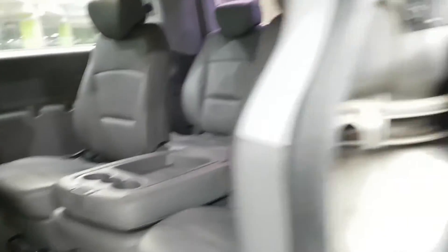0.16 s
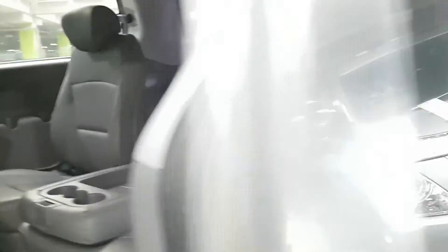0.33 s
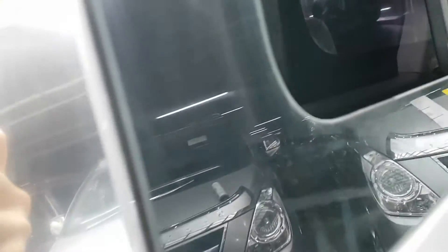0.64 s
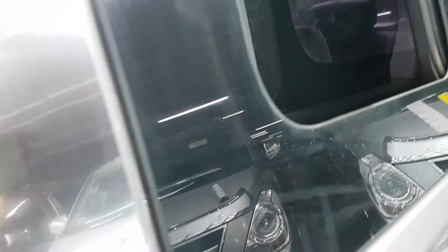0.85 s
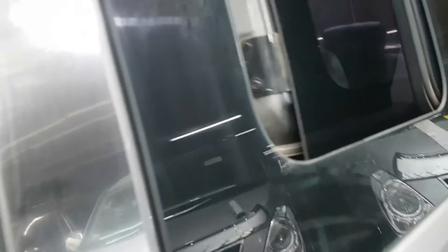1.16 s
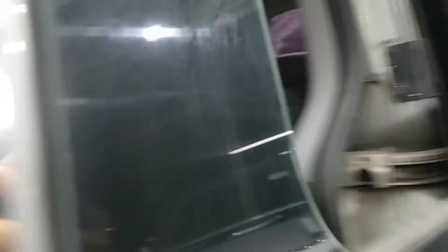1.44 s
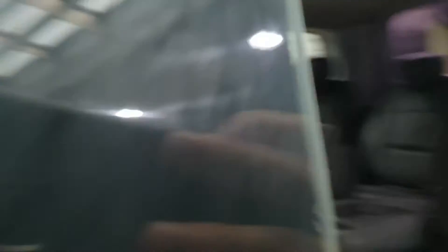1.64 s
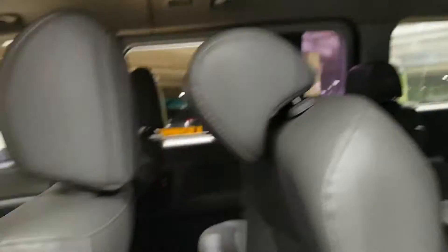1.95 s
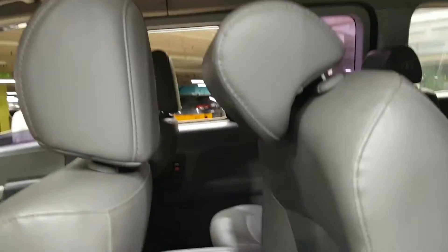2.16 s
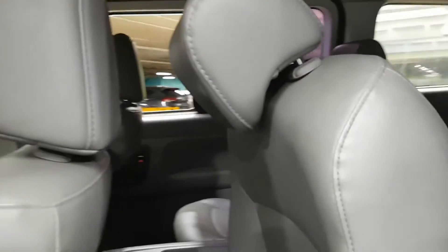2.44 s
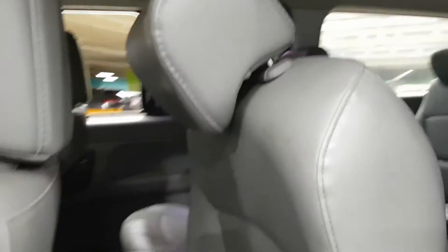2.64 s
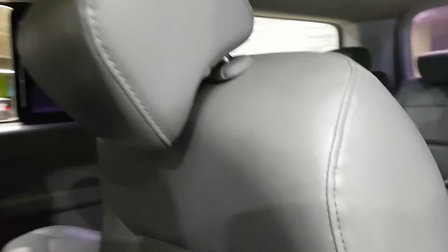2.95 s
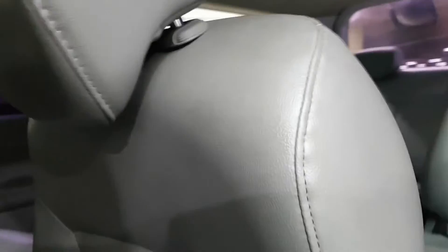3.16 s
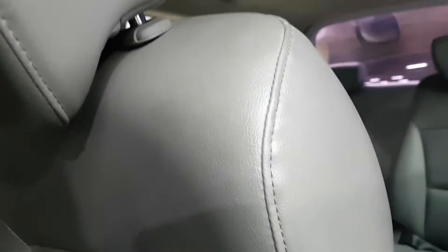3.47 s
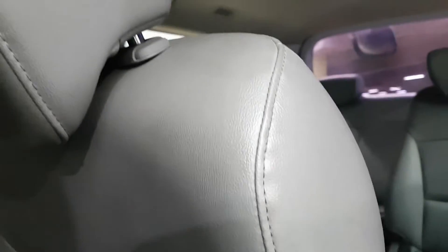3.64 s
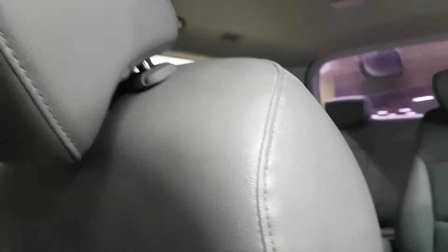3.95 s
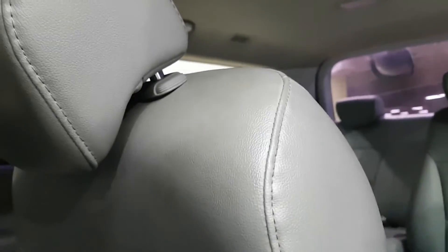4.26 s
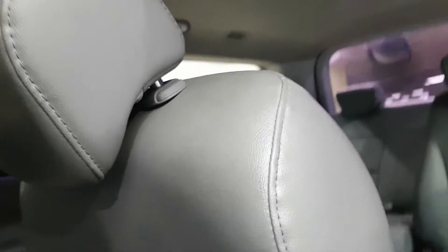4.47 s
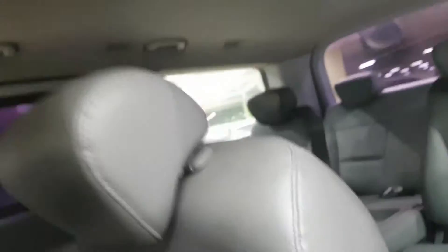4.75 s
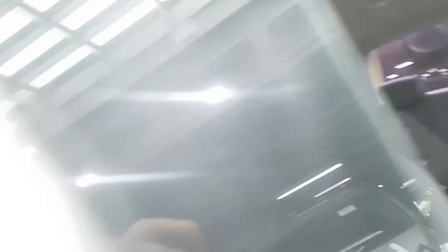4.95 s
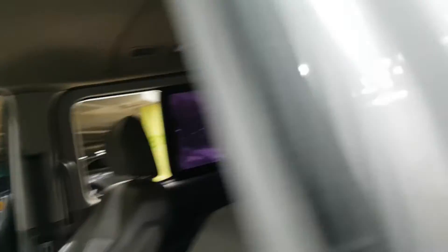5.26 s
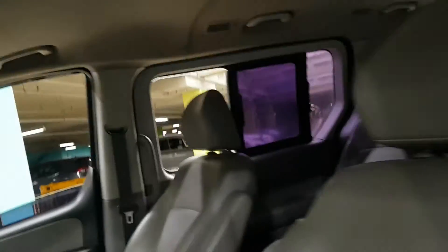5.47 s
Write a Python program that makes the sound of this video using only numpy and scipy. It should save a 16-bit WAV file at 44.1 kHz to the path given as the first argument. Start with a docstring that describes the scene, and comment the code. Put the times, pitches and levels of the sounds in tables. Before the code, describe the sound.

Over an idling van's hum, a latch clacks, a sliding door rumbles shut with a booming slam, and something knocks on a panel.

```python
"""A van idles in a parking garage: a throbbing hum and a belt drone over a wash of air.
The handle of its sliding door is pulled and the latch lets go, ringing steel and door skin.
The door rolls along its rough track, whirring higher with speed, and slams; the body booms and rattles.
Engine and air dip after the slam and return; later something knocks dully on a panel.
Blows, knocks and ticks reverberate off the concrete."""
import sys
import numpy as np
from scipy import signal
from scipy.fft import rfft, irfft, next_fast_len
from scipy.io import wavfile
from scipy.ndimage import uniform_filter1d, map_coordinates

SR = 44100
rng = np.random.default_rng(int(sys.argv[2]) if len(sys.argv) > 2 else 0)


def file_out(sig):
    """Save sig as 16-bit WAV at sys.argv[1]."""
    # one column per channel
    cols = np.atleast_2d(sig).T
    # limit, then scale
    lim = np.clip(cols, -1, 1)
    pcm = np.round(lim * 32767).astype(np.int16)
    wavfile.write(sys.argv[1], SR, pcm)


N = 247401
TIME_S = np.arange(N) / SR
HIT_TIME_S = np.arange(SR // 2) / SR


def amp(db):
    return 10 ** (np.asarray(db) / 20)


def unit(x):
    return x / np.sqrt(np.mean(x ** 2) + 1e-20)


def pan(left_minus_right_db):
    return amp([[left_minus_right_db / 2], [-left_minus_right_db / 2]])


def add_at(out, start_s, sound):
    out[..., round(start_s * SR):][..., :sound.shape[-1]] += sound


def along(points, hz):
    """Interpolate (freq_hz, value) points on a log axis."""
    freqs_hz, values = np.transpose(points)
    return np.interp(np.log(hz + 1), np.log(freqs_hz + 1), values)


def curves(rows):
    """One value per sample for each column after time_s."""
    times_s, *columns = np.transpose(rows)
    return [np.interp(TIME_S, times_s, column) for column in columns]


def gate(start_s, end_s):
    """1 from start to end, with short fades."""
    return uniform_filter1d(1. * (TIME_S > start_s) * (TIME_S < end_s), size=200)


def wobble(rate_hz):
    """Smooth random curve."""
    return map_coordinates(rng.standard_normal(int(N * rate_hz / SR) + 4), [TIME_S * rate_hz])


def filtered(x, response):
    """Apply a complex frequency response."""
    size = next_fast_len(N + SR // 2)
    return irfft(rfft(x, size) * response(np.fft.rfftfreq(size, 1 / SR)), size)[..., :N]


def mic_ports(x, lead_samples):
    """Sound reaches the left microphone port before the right."""
    return filtered(x, lambda hz: np.exp(1j * np.pi * hz * lead_samples / SR * np.array([[1], [-1]])))


def noise(spectrum, coherence, lumps_db, lumps_hz, lead_samples=0.):
    """Lumpy stereo noise, rms 1. spectrum: freq_hz, density_db; coherence: freq_hz, correlation."""
    pair = rng.standard_normal((2, N)) * amp(lumps_db * wobble(lumps_hz))

    def mid_side_gains(hz):
        angle = np.arccos(np.clip(along(coherence, hz), -1, 1)) / 2
        return amp(along(spectrum, hz)) * [np.cos(angle), np.sin(angle)]

    mid, side = filtered(pair, mid_side_gains)
    return unit(mic_ports(np.array([mid + side, mid - side]), lead_samples))


def ring(modes, t, attack_s):
    """Damped modes, at new strengths for every blow."""
    tones = sum(amp(db + rng.normal(0, 1) - 60 * t / t60_s) * np.sin(2 * np.pi * hz * t)
                for hz, db, t60_s in modes)
    return tones * (1 - np.exp(-t / attack_s))


def swells(rows, depth_db=32):
    """Gain that rises, holds and falls for each row."""
    gain = np.zeros(N)
    for start_s, rise_s, hold_s, fall_s, db in rows:
        corners_s = np.cumsum([start_s, rise_s, hold_s, fall_s])
        shape_db = np.interp(TIME_S, corners_s, [-depth_db, 0, 0, -depth_db])
        gain += gate(start_s, corners_s[-1]) * amp(db + shape_db)
    return gain


def dip_db(lowest_s=2.65, fall_s=0.61, depth_db=-11, return_tau_s=0.34):
    """The background sinks after the slam and creeps back."""
    t = TIME_S - lowest_s
    return depth_db * np.where(t < 0, np.clip(1 + t / fall_s, 0, 1), np.exp(-np.abs(t) / return_tau_s))


# Air spectra: freq_hz, density_db
WASH_SPECTRUM = [(71, -9.5), (120, -9.5), (198, -13.5), (268, -13), (322, -10), (429, -14), (627, -12.5),
                 (787, -16.5), (930, -16), (1280, -20), (2600, -24), (3350, -26.5), (3800, -33),
                 (4500, -34), (5850, -57), (9900, -120)]
HISS_SPECTRUM = [(1760, -35), (3000, -20), (3260, -21.5), (4110, -18), (4860, 4), (12200, -12),
                 (15000, -10), (16000, -27)]
# Left-right likeness: freq_hz, correlation
AIR_COHERENCE = [(60, 0.6), (240, 0.92), (950, 0.31), (3770, -0.11), (15000, -0.02)]
# Air before the dip: time_s, level_db
AIR_LEVELS = [(0, -37.5), (1.1, -35.5), (2.6, -35.5), (3.7, -38), (4.4, -37.5), (5.2, -35.5), (5.61, -36.5)]


def garage_air():
    """A broad wash under a fainter high hiss."""
    wash = noise(WASH_SPECTRUM, AIR_COHERENCE, lumps_db=.3, lumps_hz=40)
    hiss = amp(-21.5) * noise(HISS_SPECTRUM, AIR_COHERENCE, lumps_db=.3, lumps_hz=60)
    return amp(curves(AIR_LEVELS)[0] + dip_db()) * (wash + hiss) * pan(-.8)


# Faint swells: start_s, rise_s, hold_s, fall_s, level_db
THIN_HISS_SWELLS = [(.0, 0.074, 0.23, .1, -62.5)]
RUSTLE_SWELLS = [(.587, 0.0069, 0.021, 0.054, -44), (3.2, .07, 0.3, .1, -58)]


def thin_hiss(sink_hz_per_s=1500):
    """A narrow band slides down from about 11.5 kHz."""
    spectrum = [(10300, -40), (11300, -3), (11900, -2), (12700, -8), (14000, -42)]
    band = noise(spectrum, [(9000, .3)], lumps_db=1, lumps_hz=40.4)
    shift = np.exp(-1j * np.pi * sink_hz_per_s * TIME_S ** 2)
    return swells(THIN_HISS_SWELLS) * np.real(shift * signal.hilbert(band))


def rustle():
    """Brief, bright, grainy noise."""
    spectrum = [(1200, -27), (2500, 4), (4000, 0), (8000, -5), (12000, -8), (16000, -8)]
    return swells(RUSTLE_SWELLS) * noise(spectrum, [(9000, 0.34)], lumps_db=2, lumps_hz=149)


# Engine partials: firing_multiple, level_db
LOW_HUM_ORDERS = [(1, 4.5), (2, -1)]
HIGH_HUM_ORDERS = [(5, -20), (6, 0), (7, -5), (8, -8), (9, -2), (10, -6.5), (11, -12), (12, -3), (13, -13),
                   (15, -15), (18, -7), (19, -7.5), (24, -10), (36, -6)]
BELT_ORDERS = [(12.45, 0), (11.8, -7), (24.95, -14), (21.95, -16)]
# Idle speed: time_s, firing_hz
FIRING_RATE = [(0, 26.14), (3.4, 26.14), (4, 26.23), (5.61, 26.23)]
# Engine before the dip: time_s, hum_db, drone_db
ENGINE_LEVELS = [(0, -34, -46.5), (1.1, -31.5, -50), (1.8, -31.5, -47), (2.2, -35.5, -48),
                 (2.9, -35, -39.5), (3.5, -36, -42), (4, -35.5, -43.5), (4.8, -37, -38), (5.3, -40.5, -38),
                 (5.61, -48, -45)]


def engine(first_firing_s=0.00897, lean_in_s=(1.5, 2.2)):
    """Firing orders throb in step, with one puff per firing and a belt-driven drone near 320 Hz."""
    hum_db, drone_db = np.add(curves(ENGINE_LEVELS), dip_db())
    # The balance shifts as the microphone leans from beside the van into the doorway.
    low_gain, fourth_gain, high_gain = [amp(hum_db + np.interp(TIME_S, lean_in_s, from_to_db))
                                        for from_to_db in ((-18, -11), (-3, -5.5), (-17, -14))]
    firing_hz = curves(FIRING_RATE)[0]
    phase = 2 * np.pi * (np.cumsum(firing_hz) / SR - firing_hz[0] * first_firing_s)

    def partials(orders, waver_db):
        return sum(np.sqrt(2) * amp(db + waver_db * wobble(6)) * np.cos(k * phase + rng.normal(0, .4))
                   for k, db in orders)

    hum = low_gain * partials(LOW_HUM_ORDERS, waver_db=.8)
    hum += amp(hum_db) * partials([(3, 0)], waver_db=.45)
    hum += fourth_gain * partials([(4, 0)], waver_db=.64)
    hum += high_gain * partials(HIGH_HUM_ORDERS, waver_db=2.9)
    drone = amp(drone_db) * partials(BELT_ORDERS, waver_db=.6)
    pipe_spectrum = [(25, -30), (40, -5), (150, -5), (280, -11), (600, -25), (1200, -63)]
    pipe = noise(pipe_spectrum, [(100, 0.75)], lumps_db=7.5, lumps_hz=8.3)
    puffs = high_gain * amp(2.5) * unit(np.exp(1.9 * np.cos(phase)) * pipe)
    return (hum + drone + puffs) * pan(-.6)


# Garage decay: freq_hz, t60_s
GARAGE_DECAY = [(100, 0.34), (1000, 0.41), (5000, 0.23), (14000, 0.33)]


def garage_reverb(x, predelay_samples=300):
    """Reflections off concrete; each frequency dies at its own rate."""
    hz, t, bins = signal.stft(rng.standard_normal((2, SR // 2)), SR, nperseg=256)
    decay = amp(-60 * t / along(GARAGE_DECAY, hz)[:, None])
    tail = signal.istft(bins * decay, SR, nperseg=256)[1]
    delayed = np.pad(x, ((0, 0), (predelay_samples, 0)))
    return signal.fftconvolve(delayed, tail / np.linalg.norm(tail[0]), axes=1)[:, :N]


# Small ticks: start_s, level_db, pitch_hz, t60_s
TICK_EVENTS = [(0.5919, -34.5, 4200, 0.027), (.609, -34, 2590, 0.017), (0.637, -29.5, 3600, 0.016),
               (.705, -48, 7100, .01), (.88, -34, 7500, 0.016), (1.92, -45, 4500, 0.034),
               (2.1675, -20.5, 2700, 0.015), (3.092, -42, 7500, .008), (3.253, -45, 8900, .03),
               (3.827, -41.5, 9100, .01), (5.173, -40.5, 4500, 0.017)]


def ticks(band_ratio=1.67):
    """Short bright bursts of band noise."""
    out, t = np.zeros((2, N + SR)), HIT_TIME_S
    for start_s, db, hz, t60_s in TICK_EVENTS:
        band = signal.butter(2, [hz / band_ratio, hz * band_ratio], "band", fs=SR, output="sos")
        burst = unit(signal.sosfilt(band, rng.standard_normal((2, len(t)))))
        add_at(out, start_s, burst * amp(db - 60 * t / t60_s))
    return out[:, :N]


# Latch parts: freq_hz, density_db
LATCH_SPECTRUM = [(290, -23), (500, -8.5), (974, -8), (1190, -7), (1550, -11), (2230, -14.5), (2540, -15.5),
                  (2890, -16), (3440, -21.5), (6610, -25.5), (8960, -31.5), (14700, -30.5), (16000, -38)]


def latch_clatter():
    """Unbroken noise of loose latch parts, for contacts to draw on."""
    return noise(LATCH_SPECTRUM, [(600, 0.43), (2000, 0.14), (8000, 0.076)], lumps_db=-1, lumps_hz=114.85)


def contact(clatter, cutoff_hz):
    """A random stretch of clatter; a softer contact is duller."""
    lowpass = signal.butter(2, cutoff_hz, fs=SR, output="sos")
    start = rng.integers(N - len(HIT_TIME_S))
    return signal.sosfilt(lowpass, clatter[:, start:start + len(HIT_TIME_S)])


# Trim panel: pitch_hz, level_db, t60_s
TRIM_MODES = [(54, -12, 0.2), (158.3, -1.5, 0.1), (229, 7, 0.066), (262, -3, 0.065), (323, -11, 0.089),
              (370.3, -14.5, 0.25), (498, -7, 0.066), (608, -1.5, 0.052), (630, -6.5, 0.064),
              (1000, -23, 0.1), (1695, -21, 0.049)]
# Dull knocks: start_s, ring_db, rattle_db, left_minus_right_db
PANEL_KNOCKS = [(3.399, -29.5, -40.5, -5), (3.538, -4.5, -26.5, 0.5), (3.579, -16, -34.5, -5),
                (4.107, -33, -42, -5)]


def panel_knocks(clatter):
    """Knocks ring a panel and rattle loose parts."""
    out, t = np.zeros((2, N + SR)), HIT_TIME_S
    for start_s, ring_db, rattle_db, pan_db in PANEL_KNOCKS:
        rattle_gain = amp(rattle_db - 60 * t / 0.16) * (1 - np.exp(-t / 0.0027))
        rattle = rattle_gain * contact(clatter, cutoff_hz=6900)
        panel = amp(ring_db) * ring(TRIM_MODES, t, attack_s=0.0047)
        add_at(out, start_s, (panel + rattle) * pan(pan_db))
    return out[:, :N]


# Uneven spots of the track: start_s, level_db
TRACK_BUMPS = [(1.113, -17.5), (1.164, -13), (1.236, -20), (1.302, -22), (1.351, -27), (1.392, -33),
               (1.469, -17), (1.535, -17), (1.616, -6.5), (1.706, -5.5), (1.789, -5.5), (1.88, -11),
               (1.955, -14), (2.041, -6)]
# Door on its runner: pitch_ratio, level_db, t60_s
RUNNER_MODES = [(1, 0, .1), (1.68, -4, .09), (2.35, -7, .06)]


def track_jolts(speed):
    """Bumps ring the door on its runner, higher at speed."""
    out, t = np.zeros(N + SR), np.arange(SR // 4) / SR
    for start_s, db in TRACK_BUMPS:
        lowest_hz = np.interp(speed[round(start_s * SR)], [0, 1], (173.3, 215))
        modes = np.multiply(RUNNER_MODES, [lowest_hz, 1, 1])
        add_at(out, start_s, amp(db) * ring(modes, t, attack_s=0.0063))
    return out[:N]


# Rolling spectra: freq_hz, density_db
RUMBLE_SPECTRUM = [(35, -50), (60, -13), (168, -2), (200, 2.5), (275, -2.5), (337, -5.5), (410, -11),
                   (494, -13), (700, -20), (910, -50), (1540, -120)]
TRACK_SPECTRUM = [(210, -33), (350, -0.5), (612, -3), (740, -8), (979, -9), (1200, -10), (1280, -14),
                  (2500, -26.5), (3250, -69), (5500, -120)]
SEAL_SPECTRUM = [(880, -26), (1500, -1.5), (3250, -8.5), (4330, -14), (4590, -14), (5940, -23), (9470, -31),
                 (15100, -29), (16000, -39)]
# Door travel: time_s, speed_fraction
DOOR_SPEED = [(1.09, .005), (1.125, 0), (1.289, 0.1), (1.351, 0.24), (1.5, .5), (1.8, .91), (1.898, 0.95),
              (2.002, 0.86), (2.129, 0.9)]


def door_roll(whir_hz=(300, 838), tuck_s=1.87, tuck_db_per_s=18):
    """Rollers on the rough track shake the door skin; their whir rises with speed; the seal hisses."""
    speed = np.clip(curves(DOOR_SPEED)[0], .001, 1)
    moving = gate(DOOR_SPEED[0][0], DOOR_SPEED[-1][0])

    def drive(full_speed_db, db_per_decade):
        return moving * amp(full_speed_db + db_per_decade * np.log10(speed))

    tuck = amp(-tuck_db_per_s * np.maximum(TIME_S - tuck_s, 0))  # the door swings in towards the body
    phase = 2 * np.pi * np.cumsum(np.interp(speed, [0, 1], whir_hz)) / SR
    whir_band = unit(wobble(220) * np.sin(phase) + wobble(220) * np.cos(phase))
    whir = drive(-23.5, 53) * tuck ** 2 * whir_band
    rollers = mic_ports(whir + track_jolts(speed), lead_samples=6.7)
    coherence = [(100, 0.99), (400, 0.96), (1000, 0.84), (3000, 0.088)]
    rumble = noise(RUMBLE_SPECTRUM, coherence, lumps_db=0.5, lumps_hz=30, lead_samples=4.8)
    track = noise(TRACK_SPECTRUM, coherence, lumps_db=0.5, lumps_hz=60.9, lead_samples=10.5)
    seal = noise(SEAL_SPECTRUM, coherence, lumps_db=1, lumps_hz=84)
    return rollers + drive(-15.5, 9) * rumble + tuck * (drive(-18.5, 22.5) * track + drive(-35.5, 23) * seal)


# Door skin, van body, latch steel: pitch_hz, level_db, t60_s
SKIN_MODES = [(158.4, -5.5, 0.29), (234.3, 6, 0.12), (269, -2.5, 0.18), (299, 0, 0.17), (359, -6, 0.21),
              (453, -3.5, 0.088), (512, -1.5, 0.061), (618, -5, 0.067)]
BODY_MODES = [(28, -9, .6), (36, -6, 0.21), (61, 10, 0.079), (78.6, -3.5, 0.44), (102.5, -1, 0.27)]
STRIKER_MODES = [(980, -4, .03), (1180, 0, .045), (1400, -3, .035), (1910, -5, .03), (2900, -9, .02),
                 (4300, -12, .02)]
# Blows: start_s, skin_db, body_db, striker_db, crack_db, rattle_db, cutoff_hz, left_minus_right_db
DOOR_BLOWS = [(0.7494, -26.5, -54, -9.5, -6.5, -30, 13600, 3), (0.754, -20, -45, -44, -35, -39, 8900, -2),
              (0.7647, -12, -35, -32, -32, -21, 9000, 0.5), (0.788, -20, -33, -38, -27, -46, 9050, 1),
              (0.947, -28, -55, -41, -34, -31.5, 3000, 1), (2.108, -29, -42, -17, -16, -26, 14100, -0.5),
              (2.121, -33, -36, -33, -16.5, -24, 14100, 4), (2.132, -15, -11.5, -35, -17.5, -35, 5030, -3),
              (2.168, -19, -39, -30, -34, -31, 6000, 3)]


def door_blows(clatter):
    """Unlatching and landing ring skin, body and striker; the latch parts crack, then rattle."""
    out, t = np.zeros((2, N + SR)), HIT_TIME_S
    for start_s, skin_db, body_db, striker_db, crack_db, rattle_db, cutoff_hz, pan_db in DOOR_BLOWS:
        skin = amp(skin_db) * ring(SKIN_MODES, t, attack_s=0.0015)
        body = amp(body_db) * ring(BODY_MODES, t, attack_s=0.0034)
        striker = amp(striker_db) * ring(STRIKER_MODES, t, attack_s=0.00071)
        latch_gain = amp(crack_db - 60 * t / 0.032) + amp(rattle_db - 60 * t / 0.1)
        latch = latch_gain * contact(clatter, cutoff_hz)
        add_at(out, start_s, (skin + body + striker + latch) * pan(pan_db))
    return out[:, :N]


SLAM_S, SLAM_RISE_S, SHUDDER_S = 2.139, 0.018, 0.13


def shudder(db, sag_db_per_s, release_db_per_s, jolt_db=0, jolt_s=1):
    """Gain of the landing: quick rise, jolt, sagging shudder, release."""
    rise_db = 20 * np.minimum(TIME_S - SLAM_S, 0) / SLAM_RISE_S
    after_s = np.maximum(TIME_S - SLAM_S, 0)
    sag_db = sag_db_per_s * np.minimum(after_s, SHUDDER_S)
    release_db = release_db_per_s * np.maximum(after_s - SHUDDER_S, 0)
    return amp(db + rise_db + jolt_db * np.exp(-after_s / jolt_s) - sag_db - release_db)


# Slam spectra: freq_hz, density_db
BOOM_SPECTRUM = [(13, -34), (22, -5), (178, 0), (237, -2), (263, 0.5), (306, -8.5), (355, -10.5),
                 (425, -13.5), (566, -21.5), (800, -27), (1040, -31), (1760, -120)]
RATTLE_SPECTRUM = [(260, -29), (450, -10), (684, -4.5), (737, -11.5), (993, -13), (1420, -22.5),
                   (2230, -24.5), (6430, -45.5), (14000, -52.5), (16000, -50)]


def door_slam(split_hz=2200):
    """The whole body booms and rattles as the door lands; the boom lingers in the garage."""
    coherence = [(100, 1.0), (400, 0.9), (1000, 0.19), (3000, 0.091)]
    shake = noise(RATTLE_SPECTRUM, coherence, lumps_db=1.5, lumps_hz=68.5)
    dull = filtered(shake, lambda hz: 1 / (1 + (hz / split_hz) ** 4))
    rattle = shudder(-25, 36, 132, jolt_db=12.5, jolt_s=.008) * unit(dull)
    sizzle = shudder(-34, 56, 160, jolt_db=1.5, jolt_s=.26) * unit(shake - dull)
    boom = noise(BOOM_SPECTRUM, coherence, lumps_db=1.5, lumps_hz=24.98, lead_samples=4.3)
    boom_gain = shudder(-7, 54, 187, jolt_db=-4, jolt_s=.01)
    linger_gain = shudder(-30.5, 29, 29)
    return (boom_gain + linger_gain) * boom + rattle + sizzle


def scene():
    clatter = latch_clatter()
    hits = mic_ports(door_blows(clatter) + panel_knocks(clatter) + ticks(), lead_samples=3.16)
    reverb = amp(-7) * garage_reverb(hits)
    background = engine() + garage_air() + thin_hiss() + rustle()
    return background + hits + reverb + door_roll() + door_slam()


# Microphone port colour: freq_hz, left_minus_right_db
PORT_TILT = [(100, -1), (300, -1.5), (1500, -0.8), (8000, -.5), (14000, -2)]


def record(dry, low_cut_hz=18, top_hz=15900):
    """The two ports differ a little in colour; peaks round off at full scale; the band is limited."""
    def port_response(hz):
        low_cut = hz ** 2 / (hz ** 2 + low_cut_hz ** 2)
        return low_cut * amp(along(PORT_TILT, hz) / 2 * np.array([[1], [-1]]))

    tilted = filtered(dry, port_response)
    rounded = tilted / (1 + np.abs(tilted) ** 8) ** (1 / 8)
    return filtered(rounded, lambda hz: hz < top_hz)


dry = scene()
out = record(dry)
file_out(out)
```